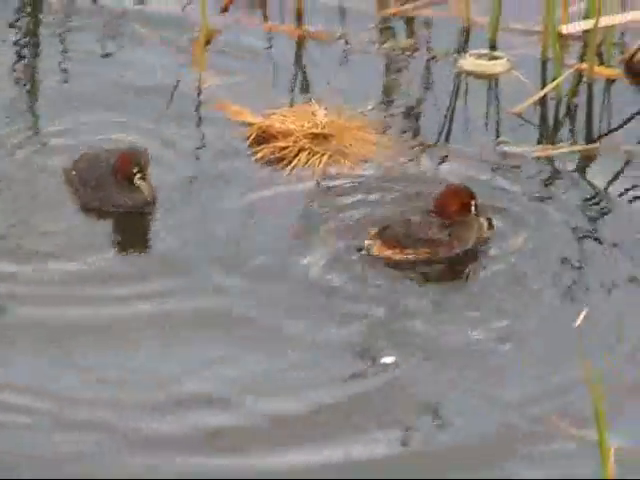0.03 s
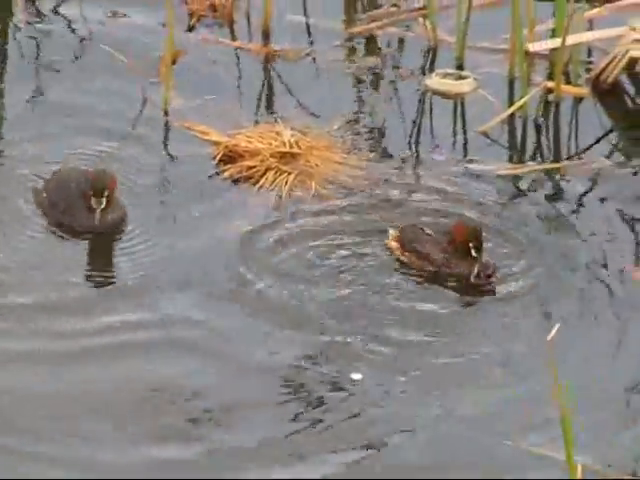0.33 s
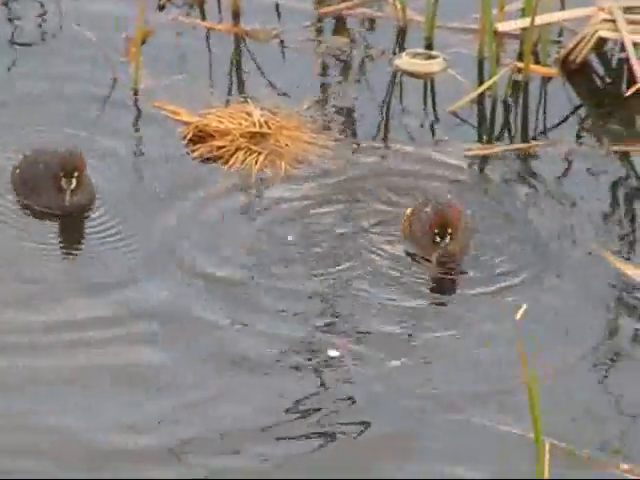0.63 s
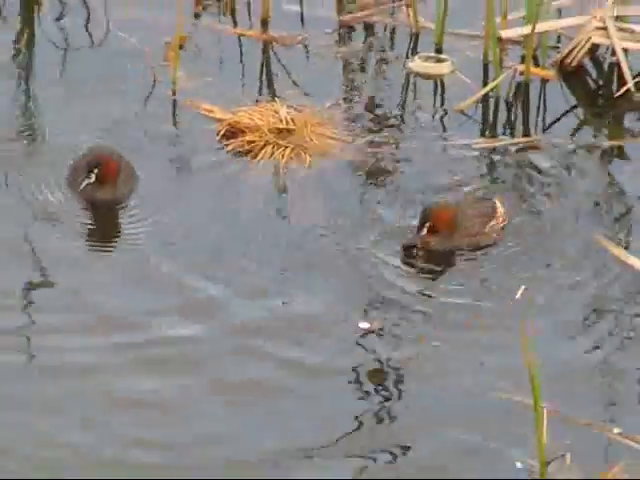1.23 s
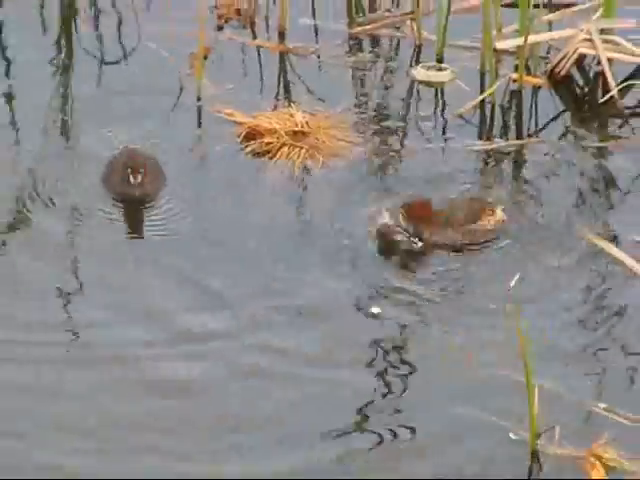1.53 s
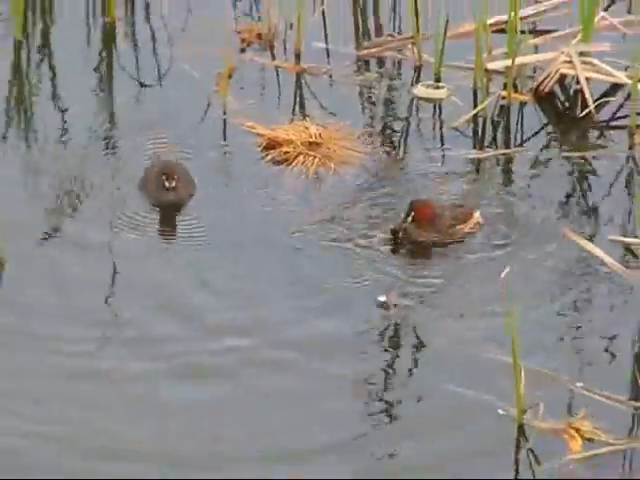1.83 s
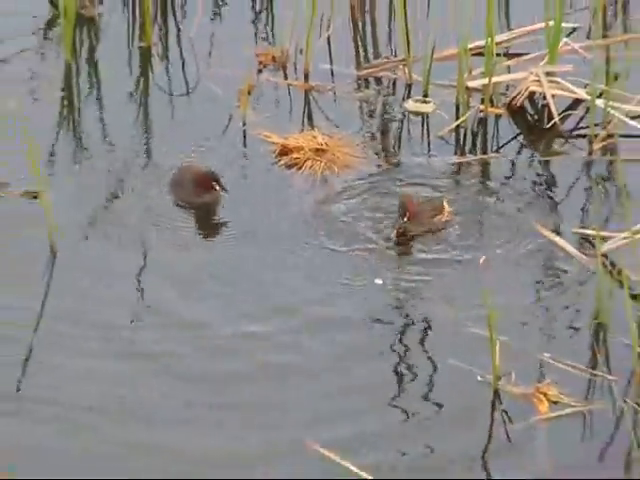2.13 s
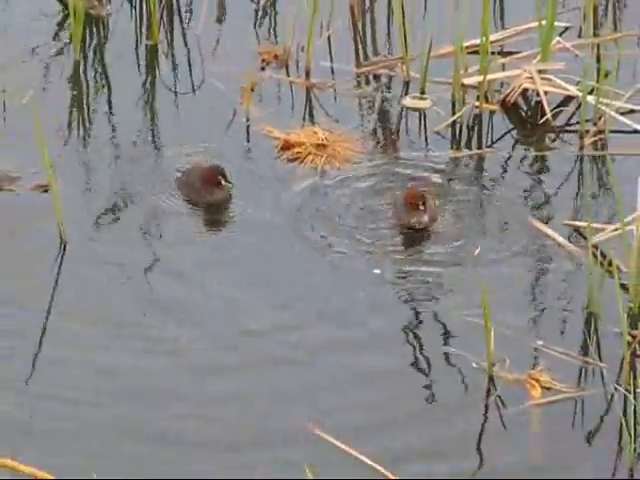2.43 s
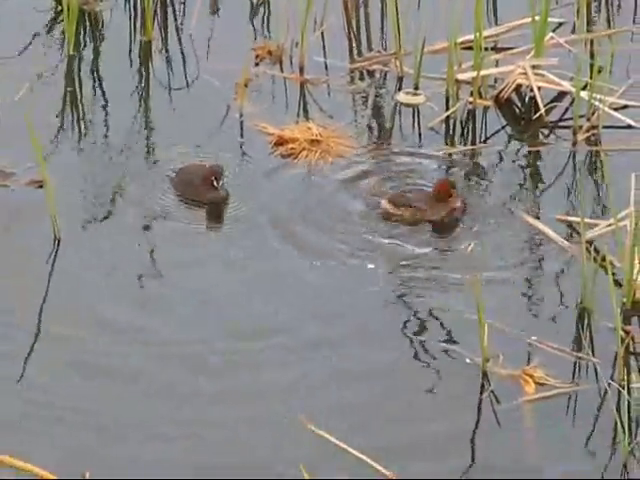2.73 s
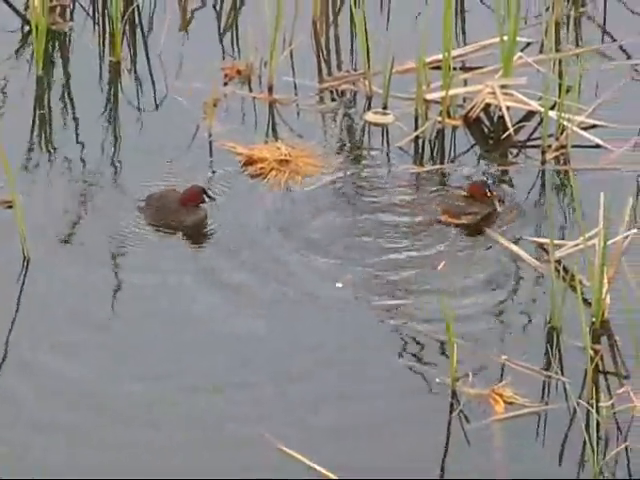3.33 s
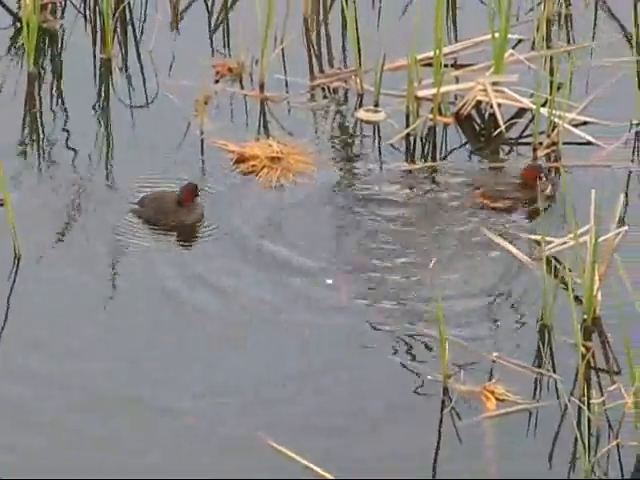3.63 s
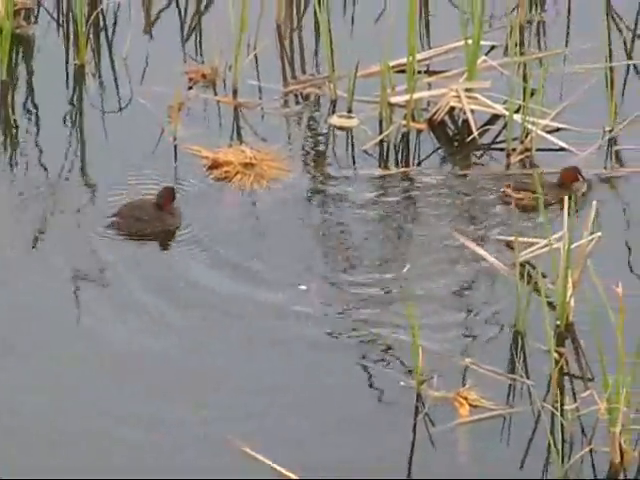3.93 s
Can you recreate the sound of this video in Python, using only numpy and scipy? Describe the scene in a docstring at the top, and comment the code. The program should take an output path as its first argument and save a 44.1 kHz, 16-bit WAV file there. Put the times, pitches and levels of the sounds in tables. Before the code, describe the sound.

A rapid, high trilling duet of two water birds, with light wind and distant rumble.

```python
"""A reedy pond: two little grebes trill in duet, their short arched notes falling in turn.
The first is shrill, with a dominant second partial, and breaks into a whistle when it pushes hardest;
the second is lower, buzzier and stops earlier. Each note is a gliding harmonic series shaped by the
throat. The bank returns a faint echo over light wind and far rumble; water drips and rings as bubbles;
a camera's zoom motor whines."""
import sys
import numpy as np
from scipy import signal
from scipy.fft import rfft, irfft
from scipy.io import wavfile
from scipy.ndimage import uniform_filter1d

SR = 44100
rng = np.random.default_rng(int(sys.argv[2]) if len(sys.argv) > 2 else 0)


def materialize(psi):
    """Save the field psi as 16-bit PCM at rate SR to the path in sys.argv[1].

    A 1-D psi becomes a single channel; in a 2-D psi each row is a channel.
    """
    bounded = np.clip(np.atleast_2d(psi).T, -1, 1)
    quanta = np.round(bounded * 32767).astype(np.int16)
    wavfile.write(sys.argv[1], SR, quanta)


N = 4 * SR
TIME_S = np.arange(N) / SR
CUTOFF_HZ = 15750

AIR_SPECTRUM = [(20, -32), (40, -8.5), (65, 2.5), (95, -8), (160, -8.5), (250, -3.5), (552, -3), (722, 0.5),
                (1270, -4), (1410, 0.5), (1710, -6.5), (2920, -4.5), (4200, -14.5), (4900, -20),
                (6730, -28.5), (12800, -34), (15500, -37.5)]  # freq_hz, density_db
AIR_TREND = [(0, 5.5), (.7, 2), (2, 1), (4, -1)]  # time_s, gain_db above RUMBLE_HZ
HISS_TREND = [(0, 4), (1.3, 4.5), (1.8, 1), (2.4, 5.5), (3.2, 2.5), (4, 0.5)]  # time_s, gain_db above HISS_HZ
AIR_COHERENCE = [(200, 0.98), (500, 0.86), (1000, 0.63), (2000, 0.46), (4000, 0.11)]  # freq_hz, left_right_correlation
AIR_HUMS = [(728, 56, -60), (1383, 23, -59.5)]  # freq_hz, width_hz, level_db
AIR_DB, RUMBLE_HZ, HISS_HZ, PATCH_DB = -41.5, 300, 3970, 1

WHINE_LEVEL = [(0, -62), (.75, -56.5), (1.2, -61.5), (1.6, -58.5), (2.2, -67.5), (2.78, -58.5), (2.92, -71),
               (3.03, -64), (3.5, -78), (4, -78)]  # time_s, level_db
# freq_hz, waver_hz, gain_db, left_minus_right_db
WHINE_TONES = [(13659, 6, 0, 2), (13800, 8, -17, 2)]
FAINT_TONES = [(7852, 3, -78, -3), (7882, 2, -78, -3)]
MOTOR_STEP_HZ, SWAY_RAD, THROB_DEPTH, FLICKER_DB, WHINE_HISS_DB = 47, 0.95, 0.4, 2.7, -8

DROPS = [(.666, 754, 0.12, -38.5, -70), (.681, 1005, 0.023, -30.5, -66), (.749, 798, 0.072, -37.5, -68),
         (.819, 860, 0.04, -37, -66), (2.096, 1110, 0.012, -33, -37.5)]  # start_s, pitch_hz, t60_s, bubble_db, splash_db

ECHO_RISE = [(2, -14), (3.2, 1), (3.3, 16), (3.6, 19), (4, -8)]  # time_s, gain_db
BANK_COLOUR = [(500, -4), (1400, -15), (2200, -8), (2750, -4.5), (3400, -4.5), (4200, 6.5), (5500, 1),
               (9000, -17), (15000, -10)]  # freq_hz, gain_db
ECHO_DELAY_S, ECHO_BASE_DB, REEDS_BASE_DB, REEDS_T60_S = 0.0255, -25, -6.5, 0.33

PORT_PHASE = [(0, 0), (2500, -0.11), (3620, -0.47), (4050, 0.71), (6720, -0.92), (7920, -1.55),
              (12100, 0.66), (15200, 0.0)]  # freq_hz, left_lead_rad
# freq_hz, left_minus_right_db
BUZZY_BALANCE = [(1000, -0.5), (2900, -3), (3600, -3), (4200, 9), (7000, 4), (14000, -7)]
SHRILL_BALANCE = [(1400, -2.5), (2900, -3), (3500, -3), (4200, 6.5), (5500, 5.5), (7000, -3), (10000, -5),
                  (14000, -4)]

# start_s, length_s, pitch_hz, scoop_ratio, droop_ratio, low_db, upper_db
BUZZY_NOTES = [(0.007, 0.034, 1142, 0.26, 0.17, -39.5, -49), (0.077, 0.029, 1088, 0.32, 0.1, -41.5, -50.5),
               (0.146, 0.034, 1082, 0.27, 0.11, -43, -50.5), (0.212, 0.034, 1089, 0.29, 0.21, -42.5, -49),
               (0.281, 0.029, 1114, 0.27, 0.13, -39, -51.5), (0.346, 0.029, 1087, 0.29, 0.21, -37.5, -51),
               (0.415, 0.029, 1084, 0.3, 0.11, -36.5, -50.5), (0.482, 0.03, 1048, 0.28, 0.13, -38.5, -48.5),
               (0.547, 0.031, 978, 0.17, 0.054, -36.5, -43.5), (0.614, 0.027, 990, 0.32, 0.066, -36, -46),
               (0.678, 0.03, 969, 0.29, 0.014, -34, -48), (0.746, 0.029, 995, 0.33, 0.096, -36.5, -48),
               (0.811, 0.031, 936, 0.25, 0.00088, -37.5, -41), (0.879, 0.027, 915, 0.29, 0.07, -39.5, -40),
               (0.946, 0.033, 847, 0.2, -0.088, -46.5, -42), (1.014, 0.031, 917, 0.21, 0.11, -38, -42),
               (1.082, 0.031, 910, 0.29, -0.07, -39.5, -41), (1.147, 0.03, 930, 0.34, 0.044, -37.5, -41.5),
               (1.213, 0.03, 973, 0.26, -0.07, -36.5, -46), (1.277, 0.033, 952, 0.26, -0.045, -34.5, -48),
               (1.348, 0.028, 929, 0.3, -0.05, -38.5, -44.5), (1.415, 0.03, 897, 0.22, -0.046, -41, -42.5),
               (1.486, 0.025, 812, 0.12, -0.16, -48, -41.5), (1.555, 0.027, 787, 0.12, -0.28, -46.5, -44.5),
               (1.813, 0.0098, 1020, 0.205, 0.11, -38.5, -62),
               (1.968, 0.022, 903, 0.042, -0.11, -39.5, -53), (2.013, 0.0214, 783, 0.14, -0.15, -46.5, -50),
               (2.087, 0.022, 850, 0.24, -0.08, -47, -46), (2.228, 0.022, 848, 0.29, -0.076, -45, -44.5),
               (2.295, 0.028, 886, 0.23, -0.017, -43, -46), (2.358, 0.029, 880, 0.13, 0.064, -48, -48),
               (2.429, 0.03, 824, 0.046, -0.22, -47, -49), (2.497, 0.033, 871, 0.2, 0.0095, -46, -46.5),
               (2.572, 0.037, 901, 0.052, 0.26, -45, -52), (2.639, 0.022, 802, 0.25, -0.012, -50, -49)]
# start_s, length_s, pitch_hz, scoop_ratio, droop_ratio, second_db, third_db, upper_db
SHRILL_NOTES = [(0.041, 0.029, 1545, 0.25, 0.11, -29, -42.5, -57),
                (0.11, 0.028, 1538, 0.23, 0.11, -27.5, -42.5, -56.5),
                (0.177, 0.027, 1547, 0.24, 0.13, -28.5, -41, -57.5),
                (0.248, 0.022, 1467, 0.2, 0.057, -29.5, -39.5, -50.5),
                (0.313, 0.027, 1540, 0.25, 0.14, -28.5, -40.5, -57.5),
                (0.379, 0.025, 1507, 0.27, 0.069, -30, -43, -55),
                (0.447, 0.023, 1506, 0.34, 0.073, -29.5, -50, -55),
                (0.513, 0.023, 1466, 0.25, 0.11, -31, -47.5, -53.5),
                (0.58, 0.021, 1432, 0.37, 0.038, -33, -46, -51),
                (0.645, 0.023, 1398, 0.31, 0.027, -34, -46.5, -48),
                (0.712, 0.026, 1426, 0.27, 0.058, -32.5, -46, -50),
                (0.776, 0.025, 1485, 0.4, 0.098, -29.5, -48, -54),
                (0.844, 0.023, 1440, 0.35, 0.066, -32, -47.5, -52),
                (0.909, 0.026, 1503, 0.34, 0.11, -28, -47.5, -58.5),
                (1.177, 0.024, 1385, 0.38, 0.00024, -35, -49, -53.5),
                (1.243, 0.026, 1370, 0.37, 0.02, -35.5, -47.5, -50),
                (1.312, 0.023, 1365, 0.37, 0.013, -37, -47, -49),
                (1.379, 0.027, 1367, 0.37, 0.036, -36.5, -45.5, -49.5),
                (1.447, 0.026, 1362, 0.36, 0.031, -36, -45.5, -50.5),
                (1.518, 0.024, 1330, 0.36, -0.0098, -37.5, -44.5, -49.5),
                (1.584, 0.029, 1359, 0.26, 0.021, -37, -45, -47),
                (1.648, 0.028, 1426, 0.48, 0.11, -35, -50, -50),
                (1.72, 0.028, 1366, 0.43, -0.016, -35, -49, -48),
                (1.901, 0.013, 1267, 0.03, -0.1, -37.5, -57, -73),
                (2.05, 0.018, 1366, 0.038, -0.0081, -28.5, -50, -52.5),
                (2.122, 0.02, 1397, 0.076, -0.0037, -26, -46.5, -57.5),
                (2.19, 0.021, 1320, 0.11, 0.034, -33, -46, -54),
                (2.259, 0.024, 1363, 0.15, 0.016, -28.5, -46, -54),
                (2.462, 0.027, 1448, 0.32, 0.069, -32.5, -47, -53.5),
                (2.53, 0.026, 1408, 0.33, 0.098, -36.5, -47, -50.5),
                (2.6, 0.023, 1395, 0.22, 0.068, -38, -43.5, -50),
                (2.667, 0.023, 1435, 0.42, 0.053, -34, -46.5, -49.5),
                (2.736, 0.023, 1330, 0.48, -0.0079, -36, -50, -47),
                (2.805, 0.026, 1288, 0.31, 0.011, -36.5, -49, -51.5),
                (2.88, 0.021, 1302, 0.31, -0.045, -36.5, -49, -49.5),
                (2.952, 0.026, 1142, 0.29, 0.039, -41, -46, -66),
                (3.022, 0.03, 1180, 0.52, -0.05, -40, -49, -64),
                (3.103, 0.025, 1158, 0.3, -0.052, -39.5, -46, -64),
                (3.183, 0.015, 1468, 0.13, 0.037, -30, -47.5, -56),
                (3.263, 0.021, 1363, 0.077, 0.073, -33.5, -51.5, -55.5),
                (3.346, 0.021, 1354, 0.035, 0.036, -31.5, -51.5, -57.5),
                (3.417, 0.031, 1274, 0.34, 0.025, -40, -50.5, -62.5),
                (3.502, 0.033, 1173, 0.25, -0.26, -43.5, -48.5, -79),
                (3.586, 0.021, 1412, 0.15, 0.074, -38, -58, -63.5),
                (3.683, 0.016, 1108, 0.44, -0.03, -44.5, -53, -73),
                (3.769, 0.02, 1424, 0.043, 0.04, -36.5, -52.5, -64),
                (3.853, 0.024, 1363, 0.044, -0.014, -33.5, -42.5, -62),
                (3.941, 0.023, 1452, 0.12, 0.045, -33, -42, -66)]
# start_s, length_s, break_ratio, whistle_hz, whistle_db, lead_db, upper_db, buzz_depth
BREAKING_NOTES = [(0.976, 0.026, 0.57, 3077, -20, -30, -51, 0.03),
                  (1.042, 0.024, 0.65, 3045, -19.5, -30, -49, 0.04),
                  (1.11, 0.025, 0.68, 3060, -20.5, -30, -50, 0),
                  (2.327, 0.0285, 0.48, 2980, -23.5, -31, -43, 0.25),
                  (2.395, 0.024, 0.7, 3037, -24, -31.5, -46, 0.14)]
# freq_hz, gain_db
BUZZY_THROAT = [(800, -8.5), (1100, -14), (1600, -1.5), (2450, -2.5), (2900, 7), (3600, 3), (4250, -11),
                (4800, -20), (5400, -21), (6100, -60), (7000, -39), (11500, -28.5), (15000, -46)]
SHRILL_THROAT = [(1000, -12.5), (1450, -6), (2100, 6), (2850, 4.5), (3080, 7.5), (3350, -4.5),
                 (4300, -17.5), (5400, -21), (6050, -25.5), (6700, -12.5), (7300, -19.5), (7900, -33.5),
                 (9500, -22), (11000, -40.5), (12200, -36), (15500, -42)]
WHISTLE_COLOUR = [(1500, -18), (2800, -2.5), (3200, -0.5), (4500, -35), (7600, -45), (9100, -37),
                  (10600, -45), (12200, -35), (15000, -58)]
# attack, release: shares of length; start, flutter: of level; jitter: of pitch; rasp: rad;
# gain_db; push_db: loss per unit of pitch sag
BUZZY_VOICE = dict(attack=0.44, release=0.31, start=0.34, jitter=0.015, flutter=0.19, rasp=0.041, gain_db=1)
SHRILL_VOICE = dict(attack=0.47, release=0.29, start=0.49, push_db=26, jitter=0.0064, flutter=0.053, rasp=0.031, gain_db=0.66)
HOOK_DEPTH, HOOK_SPAN = 0.064, 0.061  # closing pitch drop: shares of pitch, of length
GROWL_HZ, BREAK_PITCH_RATIO, BREAK_S, WHISTLE_RELEASE_S = 871, 0.95, 0.0011, 0.0038
LEAD_SWELL_DB, BUZZ_HZ, BUZZ_RAD = 17.5, 450, 0.6


def amp(db):
    """Decibels to gain."""
    return 10 ** (np.asarray(db) / 20)


def unit(x):
    """Scale to rms 1."""
    return x / np.sqrt(np.mean(abs(x) ** 2) + 1e-20)


def at_hz(points, hz):
    """Interpolate over log frequency."""
    knots_hz, values = np.transpose(points)
    return np.interp(np.log(hz + 1), np.log(knots_hz + 1), values)


def at_time(points, time_s):
    """Interpolate over time."""
    return np.interp(time_s, *np.transpose(points))


def add(mix, start_s, sound):
    """Mix in at start_s."""
    part = mix[max(round(start_s * SR), 0):][:len(sound)]
    part += sound[:len(part)]


def wobble(samples):
    """Smoothed noise, rms 1."""
    return unit(uniform_filter1d(uniform_filter1d(rng.standard_normal(N), samples), samples))


def narrow_noise(centre_hz, width_hz):
    """Noise in one resonance."""
    hz = np.fft.rfftfreq(N, 1 / SR)
    return unit(irfft(rfft(rng.standard_normal(N)) / (1 + (2 * (hz - centre_hz) / width_hz) ** 2), N))


def tones(rows, sway_rad=0):
    """Wavering stereo sines."""
    out = np.zeros((2, N))
    for hz, waver_hz, db, side_db in rows:
        phase = 2 * np.pi * np.cumsum(hz + waver_hz * wobble(1500)) / SR + sway_rad
        out += np.sqrt(2) * amp(db + np.array([[.5], [-.5]]) * side_db) * np.sin(phase)
    return out


def air():
    """Light wind easing off over far rumble, with drifting patches and narrow hums."""
    frames, hz = N // 256 + 5, np.fft.rfftfreq(1024, 1 / SR)
    t = np.arange(frames)[:, None] * 256 / SR
    noise = rng.standard_normal((5, frames, len(hz)))
    left, independent = noise[0] + 1j * noise[1], noise[2] + 1j * noise[3]
    patches = unit(uniform_filter1d(uniform_filter1d(noise[4], 12, axis=0), 10, axis=1))
    coherence = at_hz(AIR_COHERENCE, hz)
    right = coherence * left + np.sqrt(1 - coherence ** 2) * independent
    trend_db = at_time(AIR_TREND, t) * hz / (hz + RUMBLE_HZ)
    trend_db += at_time(HISS_TREND, t) * hz ** 2 / (hz ** 2 + HISS_HZ ** 2)
    spectra = np.array([left, right]) * amp(at_hz(AIR_SPECTRUM, hz) + trend_db + PATCH_DB * patches)
    wind = signal.istft(spectra.transpose(0, 2, 1), nperseg=1024, noverlap=768)[1][:, :N]
    hums = sum(amp(db) * narrow_noise(hz, width_hz) for hz, width_hz, db in AIR_HUMS)
    return amp(AIR_DB) * unit(wind) + hums


def zoom_motor():
    """Thin whine, swayed by the motor's steps, fading as the lens stops; a faint steady whistle."""
    hiss = np.array([narrow_noise(centre_hz=13690, width_hz=200) for _ in range(2)])
    level = amp(at_time(WHINE_LEVEL, TIME_S) + FLICKER_DB * wobble(1200))
    step_rad = 2 * np.pi * MOTOR_STEP_HZ * TIME_S
    whine = (1 + THROB_DEPTH * np.cos(step_rad)) * tones(WHINE_TONES, SWAY_RAD * np.sin(step_rad))
    return level * (whine + amp(WHINE_HISS_DB) * hiss) + tones(FAINT_TONES)


def drops():
    """Each drip: a tiny splash and a bubble ringing upward in pitch."""
    out, t = np.zeros(N), TIME_S[:SR // 10]
    for start_s, hz, t60_s, bubble_db, splash_db in DROPS:
        splash = unit(signal.lfilter([1], [1, -.7], rng.standard_normal(len(t))))
        bubble = amp(bubble_db - 60 * t / t60_s) * np.sin(2 * np.pi * hz * t * (1 + 4 * t))
        add(out, start_s, bubble + amp(splash_db) * splash * np.exp(-t / 0.0011))
    return out


def bank(calls):
    """One bank echo, stronger late in the trill, plus short scatter from the reeds."""
    t = TIME_S[:SR // 2]
    tail = rng.standard_normal((2, len(t))) * amp(-60 * t / REEDS_T60_S) * np.minimum(t / 0.0079, 1)
    tail = amp(REEDS_BASE_DB) * tail / np.linalg.norm(tail[0])
    delayed = np.pad(calls, (round(ECHO_DELAY_S * SR), 0))[:N]
    echo = delayed * amp(ECHO_BASE_DB + at_time(ECHO_RISE, TIME_S))
    colour = amp(at_hz(BANK_COLOUR, np.fft.rfftfreq(2 * N, 1 / SR)))
    return irfft((rfft(calls, 2 * N) * rfft(tail, 2 * N) + rfft(echo, 2 * N)) * colour)[:, :N]


def mic_ports(bird, balance):
    """Two microphone ports hear a bird at different level and phase."""
    hz = np.fft.rfftfreq(2 * N, 1 / SR)
    left_gain = amp(at_hz(balance, hz) / 2) * np.exp(.5j * at_hz(PORT_PHASE, hz))
    return irfft(rfft(bird, 2 * N) * np.array([left_gain, 1 / left_gain]))[:, :N]


def hook(progress):
    """Fractional pitch drop at a note's end."""
    return HOOK_DEPTH * np.exp((progress - 1) / HOOK_SPAN)


def trill(notes, throat, attack, release, start, jitter, flutter, rasp, gain_db, push_db=0):
    """Notes scoop up, bend and hook down; their partials slide through the throat's resonances."""
    out, drift, shake, grain = np.zeros(N), wobble(40), wobble(50), wobble(10)
    for start_s, length_s, pitch_hz, scoop, droop, partials in notes:
        span = int(start_s * SR) + np.arange(int(length_s * SR))
        progress = np.linspace(0, 1, len(span))
        sag = scoop * (1 - progress) ** 3 + droop * progress ** 3 + hook(progress)
        hz = pitch_hz * (1 - sag) * (1 + jitter * drift[span])
        phase = 2 * np.pi * np.cumsum(hz) / SR + rasp * grain[span]
        envelope = np.interp(progress, [0, attack], [start, 1]) * np.minimum(progress / 0.069, 1)
        envelope *= np.sin(np.pi / 2 * np.minimum((1 - progress) / release, 1))
        envelope *= amp(gain_db - push_db * sag) * (1 + flutter * shake[span])
        # Throat gain is relative to each partial's anchor harmonic.
        tone = sum(amp(db + at_hz(throat, k * hz) - at_hz(throat, anchor * pitch_hz)) * np.sin(k * phase)
                   for k, (anchor, db) in enumerate(partials, 1))
        add(out, start_s, np.sqrt(2) * envelope * tone)
    return out


def buzzy_bird():
    """Lower grebe: partials 1-3 anchored to the third, 4-13 to the fourth."""
    notes = [(*shape, [(3, low_db)] * 3 + [(4, upper_db)] * 10)
             for *shape, low_db, upper_db in BUZZY_NOTES]
    return trill(notes, BUZZY_THROAT, **BUZZY_VOICE)


def shrill_bird():
    """Higher grebe: the second partial leads; louder as the pitch is pushed up."""
    notes = [(*shape, [(2, second_db)] * 2 + [(3, third_db)] + [(5, upper_db)] * 4 + [(2, second_db)] * 4)
             for *shape, second_db, third_db, upper_db in SHRILL_NOTES]
    return trill(notes, SHRILL_THROAT, **SHRILL_VOICE)


def breaking_notes():
    """The shrill bird's hardest notes: a buzzy climb flips into a nearly pure whistle."""
    out, drift, grain = np.zeros(N), wobble(40), wobble(10)
    for start_s, length_s, break_at, whistle_hz, whistle_db, lead_db, upper_db, depth in BREAKING_NOTES:
        span = int(start_s * SR) + np.arange(int(length_s * SR))
        t, progress = TIME_S[:len(span)], np.linspace(0, 1, len(span))
        flip = .5 + .5 * np.tanh((progress - break_at) * length_s / BREAK_S / 2)
        climb = np.minimum(progress / break_at, 1)
        top_hz = whistle_hz / 2  # the whistle is partial 2
        break_hz = BREAK_PITCH_RATIO * top_hz
        hz = (1 - flip) * (GROWL_HZ + (break_hz - GROWL_HZ) * climb ** 0.788) + flip * top_hz
        hz *= 1 - hook(progress) + 0.0043 * drift[span]
        buzz = depth * np.sin(2 * np.pi * BUZZ_HZ * t)
        phase = 2 * np.pi * np.cumsum(hz) / SR + BUZZ_RAD * buzz + 0.029 * grain[span]
        partials_db = [lead_db, lead_db, lead_db + 3] + [upper_db - at_hz(SHRILL_THROAT, 5 * break_hz)] * 7
        lead = sum(amp(db + at_hz(SHRILL_THROAT, k * hz) - 3.5) * np.sin(k * phase)
                   for k, db in enumerate(partials_db, 1))
        lead *= amp(LEAD_SWELL_DB * (climb - 1))
        whistle = sum(amp(whistle_db + at_hz(WHISTLE_COLOUR, k * hz)) * np.sin(k * phase)
                      for k in range(1, 11))
        release = np.sin(np.pi / 2 * np.minimum((length_s - t) / WHISTLE_RELEASE_S, 1))
        envelope = np.minimum(t / 0.002, 1) * release * (1 + .5 * buzz)
        add(out, start_s, np.sqrt(2) * envelope * ((1 - flip) * lead + flip * whistle))
    return out


def scene():
    """Duet, reflections, drips, air and motor in stereo."""
    shrill, buzzy = shrill_bird() + breaking_notes(), buzzy_bird()
    direct = mic_ports(shrill, SHRILL_BALANCE) + mic_ports(buzzy, BUZZY_BALANCE)
    return direct + bank(shrill + buzzy) + drops() + air() + zoom_motor()


def record(dry):
    """Steep low-pass."""
    lowpass = signal.firwin(511, CUTOFF_HZ, window=("kaiser", 9), fs=SR)
    return signal.oaconvolve(dry, lowpass[None], "same")


dry = scene()
out = record(dry)
materialize(out)
```